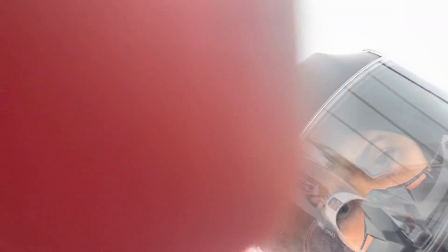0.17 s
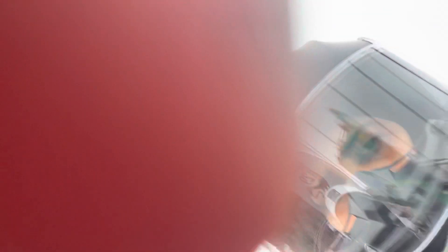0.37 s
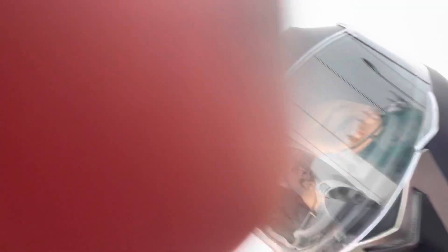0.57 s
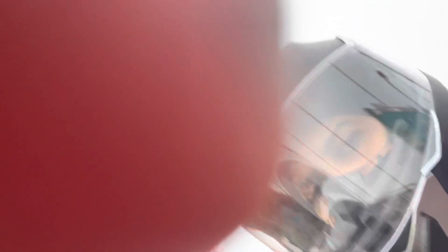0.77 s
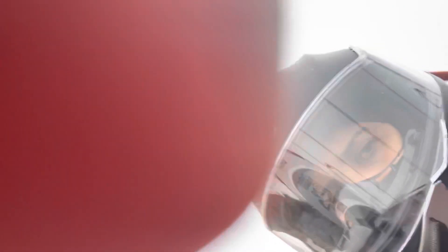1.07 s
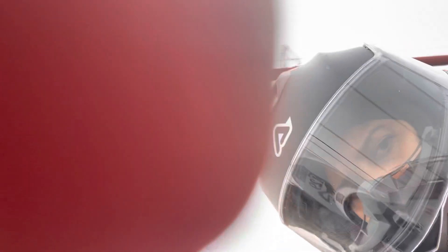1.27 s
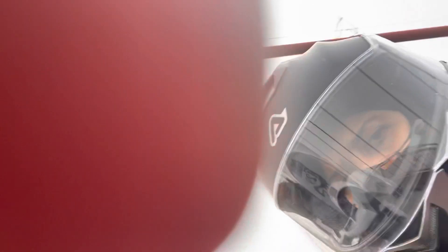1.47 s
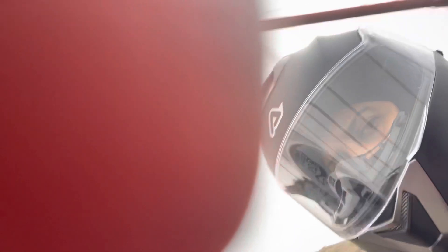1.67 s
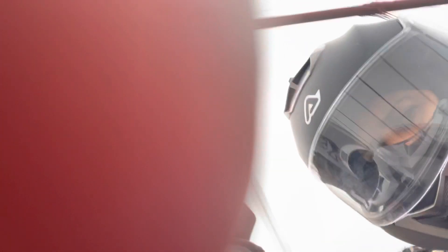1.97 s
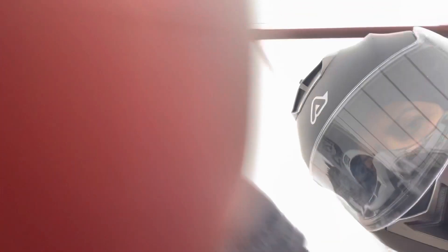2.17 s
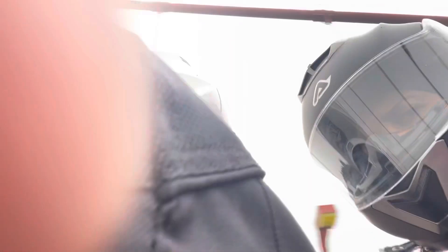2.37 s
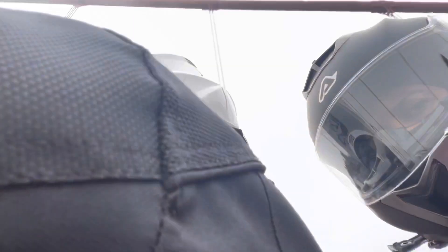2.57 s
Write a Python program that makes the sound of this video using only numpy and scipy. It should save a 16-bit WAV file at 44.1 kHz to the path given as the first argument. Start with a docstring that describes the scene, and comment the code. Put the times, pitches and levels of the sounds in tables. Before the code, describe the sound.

A twin-cylinder motorcycle throbs low and continuously from 0 s, heard on board by a handheld stereo microphone outdoors. Road and tyre roar and wind buffeting surround it. Around 0.6 s the throttle opens, making the engine's tone rougher and fuller; its pitch creeps up slightly. Ragged wind crackles cluster on the left at 0.6-0.9 s, recurring until 2.7 s. From about 2 s the tone shifts again and the roar swells.

```python
"""A motorcycle ride heard through a hand-held camera's two microphone ports.
From the start a twin engine throbs as stacked multiples of its working cycle, over banded-noise road and tyre
roar and low wind buffeting made separately for each port. Ragged noise bursts soon crackle on the exposed left
port. At about 0.6 s the throttle opens and the engine's balance shifts; it shifts again late in the pull, as
the note climbs. Gain control evens the level throughout."""
import sys
import numpy as np
from scipy import signal
from scipy.fft import rfft, irfft
from scipy.io import wavfile
from scipy.ndimage import uniform_filter1d, map_coordinates

SR = 44100
rng = np.random.default_rng(int(sys.argv[2]) if len(sys.argv) > 2 else 0)


def store_wav(level_fs):
    """Save 16-bit WAV to argv[1]."""
    pcm = np.round(np.clip(np.atleast_2d(level_fs), -1, 1) * 32767)
    wavfile.write(sys.argv[1], SR, pcm.T.astype(np.int16))


N = 120834

# Engine speed: [t/s, working cycles per second/Hz]
ENGINE_SPEED = [(0.0, 18.003), (0.3, 18.026), (0.6, 17.992), (0.9, 18.207), (1.3, 18.334), (1.7, 18.49),
                (2.1, 18.624), (2.45, 18.771), (2.74, 18.809)]
# Engine balance at light throttle, throttle open and late in the pull, before the engine trim:
# [multiple of the working cycle, level/dB]
LIGHT_THROTTLE = [(1, -39), (2, -26), (3, -11), (4, -1), (5, 1), (6, -23), (7, -16), (8, -17), (9, -29),
                  (10, -6), (11, -24), (12, -12), (13, -19), (14, -24), (15, -17), (16, -13), (17, -27),
                  (18, -26), (19, -12), (20, -16), (21, -31), (22, -23)]
OPEN_THROTTLE = [(1, -45), (2, -27), (3, -18), (4, -2), (5, 1), (6, -20), (7, -13), (8, -17), (9, -10),
                 (10, -11), (11, -14), (12, -11), (13, -12), (14, -12), (15, -30), (16, -18), (17, -23),
                 (18, -19), (19, -31), (20, -29), (21, -22), (22, -29)]
LATE_PULL = [(1, -36), (2, -24), (3, -12), (4, -7), (5, -4), (6, -26), (7, -13), (8, -17), (9, -9),
             (10, -10), (11, -14), (12, -11), (13, -13), (14, -14), (15, -30), (16, -24), (17, -31),
             (18, -24), (19, -23), (20, -17), (21, -17), (22, -24)]
# Spectral shape of the road, tyre and air roar: [f/Hz, relative level per Hz/dB]
ROAD_TONE = [(80, -34.5), (130, -37.5), (250, -40.5), (500, -44.5), (700, -47), (1000, -51), (1400, -53.5),
             (1900, -60), (2250, -68.5), (2700, -72), (3300, -73.5), (4000, -82), (5000, -81),
             (7000, -85.5), (8300, -97), (9500, -87.5), (11000, -92.5), (12200, -104), (14300, -100),
             (15500, -106)]
# Stereo balance of the roar: [f/Hz, left minus right level/dB]
ROAD_BALANCE = [(100, 4), (320, 0), (600, 1.5), (1150, -1.5), (1750, -2), (2300, 1.5), (2800, 7.5),
                (3500, 1), (4500, 2), (6000, 0), (8000, 5.5), (12000, -2.5)]
# Roar over the ride: [t/s, level before the road trim/dB, tilt above 1 kHz/dB per octave]
ROAD_SWELL = [(0.0, -27.5, 0.5), (0.25, -29, 1), (0.56, -28.5, 1), (1.15, -28, 2.5), (2.38, -25.5, 2),
              (2.74, -25, 2)]
# Spectral shape of the low buffeting on both ports: [f/Hz, relative level per Hz/dB]
BUFFET_TONE = [(20, -29), (35, 2), (55, 16.5), (80, 1), (110, 4), (150, -13.5), (300, -28), (800, -56.5)]
# Spectral shape of the flapping on the exposed left port: [f/Hz, relative level per Hz/dB]
FLAP_TONE = [(60, -16), (130, -3.5), (250, 2.5), (500, -11.5), (1000, -17), (2000, -37), (5000, -68)]
# Gusts: [t/s, left buffet level/dB, right buffet level/dB, left flap level/dB]
GUSTS = [(0, -33, -28, -20), (.15, -18, -13.5, -30), (.45, -21, -20, -23), (.56, -19, -29, -21),
         (.63, -22, -20, -11.5), (.7, -24, -21, -25.5), (.8, -33, -21, -19), (.9, -9, -20, -11),
         (1.0, -20, -20, -29), (1.3, -29, -21, -26), (1.55, -15, -19, -19), (1.7, -11, -23, -37),
         (1.85, -21, -18, -25), (2.0, -26, -20, -31), (2.15, -10, -21, -21), (2.32, -11, -11, -15),
         (2.45, -17, -22, -22.5), (2.6, -12, -25, -16), (2.66, -20, -24, -22), (2.69, -15, -24, -12),
         (2.74, -17, -33, -12.5)]
# Wind crackles: [onset t/s, level before the crackle trim/dB, length/ms, tilt above 1 kHz/dB per octave]
CRACKLES = [(0.09, -15, 6.8, -7), (0.627, -13, 10, 2.5), (0.653, -12, 5.6, 2.5), (0.779, -9.5, 6.5, 0.5),
            (0.846, -5, 6.2, 5), (0.859, -14, 3.9, 3), (0.898, -11, 3.5, 1), (0.915, -3.5, 3.9, 2),
            (1.149, -4.5, 6, 0.5), (1.208, -5, 6.1, 1.5), (1.228, -11, 5, -1), (1.423, -13, 6.3, 0),
            (1.519, -11, 7.3, 2), (1.831, -2.5, 5.8, -0.5), (2.386, -3.5, 4.7, -2), (2.526, -11, 5.4, -1),
            (2.537, -12, 4.7, -3), (2.604, -2, 4, -4), (2.637, -11, 3.8, 2), (2.684, -0.5, 4.7, -8),
            (2.691, -7.5, 3.2, 2.5)]
# Spectral shape of a crackle before its own tilt: [f/Hz, relative level per Hz/dB]
CRACKLE_COLOUR = [(100, -18), (300, -1), (700, 4), (1200, 3), (2000, -7), (4000, -23), (5200, -31),
                  (6200, -65), (15000, -110)]

# Engine: each throttle change is centred on its time
OPENS_S, OPEN_TAKES_S, LATE_S, LATE_TAKES_S = 0.63, 0.033, 2.29, 0.72
ENGINE_DB, WAVER_DB = -12, 1.29
ENGINE_LEFT_DELAY_MS, ENGINE_LEFT_LIFT_DB = .8, .4  # the right port is lowered by the same dB
# The exhaust note sweeps down once a cycle: multiples above the knee leave the pipe earlier
FIRES_AT_TURNS, KNEE_MULTIPLE, SWEEP_TURNS = .03, 7.15, .093

# Road
ROAD_DB, FLICKER_DB, GRAIN_DB = 10.5, 1.24, 1.01
ROAD_SHARED_POWER, ROAD_LEFT_DELAY_MS = 0.25, 0.461

# Wind
LURCH_DB = 3
CRACKLE_DB, CRACKLE_LEAK_DB = -9, -46
CRACKLE_BLOCK, CRACKLE_LEAD_S = 2048, .01  # samples per burst, silence ahead of its onset

# Recording chain
BASS_CUT_HZ, TOP_HZ = 30, 15700
HOLD_LEVEL, RATIO, GAIN_S, CEILING = 0.336, 1.6, .11, .97


def undb(db):
    """Amplitude factor of a level in dB."""
    return 10 ** (np.asarray(db) / 20)


def unit(x):
    """Scale x to an RMS of 1."""
    return x / np.sqrt(np.mean(x ** 2))


def curve(table, col):
    """A column of a timed table, drawn as straight lines to every sample."""
    return np.interp(np.arange(N) / SR, [row[0] for row in table], [row[col] for row in table])


def tone(table, hz):
    """Level in dB of a spectrum table at hz, straight on a log frequency axis."""
    table_hz = np.maximum([row[0] for row in table], 1)
    return np.interp(np.log(np.maximum(hz, 1)), np.log(table_hz), [row[1] for row in table])


def walk(rate):
    """Random levels held 1 / rate s and smoothed twice; standard deviation 1."""
    hold = int(SR / rate)
    steps = np.repeat(rng.standard_normal(N // hold + 1), hold)
    wander = uniform_filter1d(uniform_filter1d(steps, hold), hold)[:N]
    return wander / wander.std()


def colour(x, table):
    """Filter x by the spectral shape of a table."""
    f = np.arange(N // 2 + 1) * SR / N
    return irfft(rfft(x) * undb(tone(table, f)), N)


def late(x, ms):
    """Delay x by a fraction of samples, as a longer path to one port does."""
    return map_coordinates(x, [np.arange(N) - ms / 1000 * SR], mode="mirror")


def engine():
    """A twin's pulses as multiples of its working cycle; the balance shifts as the throttle opens."""
    t = np.arange(N) / SR
    turns = np.cumsum(curve(ENGINE_SPEED, 1)) / SR
    opened = np.clip((t - OPENS_S) / OPEN_TAKES_S + .5, 0, 1)
    later = np.clip((t - LATE_S) / LATE_TAKES_S + .5, 0, 1)
    throb = 0
    for (k, light_db), (_, open_db), (_, late_db) in zip(LIGHT_THROTTLE, OPEN_THROTTLE, LATE_PULL):
        lead_turns = SWEEP_TURNS * max(k - KNEE_MULTIPLE, 0) ** 2
        wave = np.cos(2 * np.pi * (k * (turns - FIRES_AT_TURNS) + lead_turns))
        pull = undb(open_db + (late_db - open_db) * later)
        level = (1 - opened) * undb(light_db) + opened * pull
        throb = throb + level * wave * undb(WAVER_DB * walk(3.5))
    throb = throb * undb(ENGINE_DB)
    left = late(throb, ENGINE_LEFT_DELAY_MS) * undb(ENGINE_LEFT_LIFT_DB)
    return np.array([left, throb * undb(-ENGINE_LEFT_LIFT_DB)])


def road():
    """Roar in half-octave noise bands, each flickering alone; the ports share part of it, late on the left."""
    f = np.arange(N // 2 + 1) * SR / N
    common, left, right = rng.standard_normal((3, N))
    shared = np.array([late(common, ROAD_LEFT_DELAY_MS), common])
    separate = np.array([left, right])
    pair = np.sqrt(ROAD_SHARED_POWER) * shared + np.sqrt(1 - ROAD_SHARED_POWER) * separate
    balance_db = np.array([[.5], [-.5]]) * tone(ROAD_BALANCE, f)
    spectrum = rfft(pair) * undb(tone(ROAD_TONE, f) + balance_db) * (f > 60)
    half_octaves = 2 * np.log2(np.maximum(f, 1) / 1000)  # counted from 1 kHz
    roar = 0
    for step in range(-8, 9):
        window = np.cos(np.pi / 2 * np.clip(half_octaves - step, -1, 1)) ** 2
        band = irfft(spectrum * window, N)
        flicker_db = FLICKER_DB * walk(12) + GRAIN_DB * walk(70)
        tilt_db = curve(ROAD_SWELL, 2) * max(step, 0) / 2
        roar = roar + band * undb(flicker_db + tilt_db)
    return unit(roar) * undb(curve(ROAD_SWELL, 1) + ROAD_DB)


def eddy(shape, gust_col):
    """One layer of turbulence: noise lurching within each gust, coloured, then swelled by the gusts."""
    lurching = rng.standard_normal(N) * undb(LURCH_DB * walk(25.1))
    return unit(colour(lurching, shape)) * undb(curve(GUSTS, gust_col))


def buffet():
    """Low wind turbulence, unrelated on the two ports; the exposed left port also flaps higher up."""
    left = eddy(BUFFET_TONE, 1) + eddy(FLAP_TONE, 3)
    return np.array([left, eddy(BUFFET_TONE, 2)])


def crackle():
    """Wind breaking up on the left port: short ragged noise bursts, with a faint leak to the right."""
    size = CRACKLE_BLOCK
    out = np.zeros(N + size)
    f = np.arange(size // 2 + 1) * SR / size
    t = np.arange(size) / SR - CRACKLE_LEAD_S
    above_700 = signal.butter(2, 700, "high", fs=SR, output="sos")
    noises = rng.standard_normal((len(CRACKLES), size))
    for (onset_s, db, ms, tilt), noise in zip(CRACKLES, noises):
        lengths = np.maximum(t / (ms / 1000), 0)
        envelope = np.minimum(lengths * 5, 1) * np.exp(-lengths ** 2)
        shape = undb(tone(CRACKLE_COLOUR, f) + tilt * np.log2(np.maximum(f / 1000, 1)))
        raw = rfft(noise * envelope)
        even = raw / uniform_filter1d(np.abs(raw), size=28)  # flattened, so the shape alone sets the colour
        burst = irfft(even * shape, size)
        # level is set by the energy above 700 Hz, spread over the burst's length
        loudness = np.sqrt(np.sum(signal.sosfilt(above_700, burst) ** 2) / (ms / 1000 * SR))
        i = int((onset_s - CRACKLE_LEAD_S) * SR)
        out[i:i + size] += burst / loudness * undb(db + CRACKLE_DB)
    return np.array([out[:N], out[:N] * undb(CRACKLE_LEAK_DB)])


def scene():
    """Engine, road and wind summed at the two ports."""
    return engine() + road() + buffet() + crackle()


def record(dry):
    """The bass is cut, gain control evens the level, peaks are rounded at the ceiling, the top is cut."""
    dry = signal.sosfilt(signal.butter(2, BASS_CUT_HZ, "high", fs=SR, output="sos"), dry)
    power = np.mean(dry ** 2, axis=0)  # both ports share one gain
    level = np.sqrt(uniform_filter1d(power, int(GAIN_S * SR)))
    held = dry * np.minimum(HOLD_LEVEL / level, 1) ** (1 - 1 / RATIO)
    rounded = held / (1 + (np.abs(held) / CEILING) ** 10) ** (1 / 10)
    return signal.sosfilt(signal.ellip(8, .2, 70, TOP_HZ, fs=SR, output="sos"), rounded)


dry = scene()
out = record(dry)
store_wav(out)
```